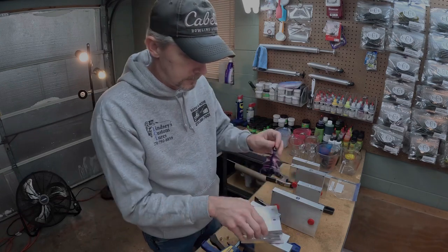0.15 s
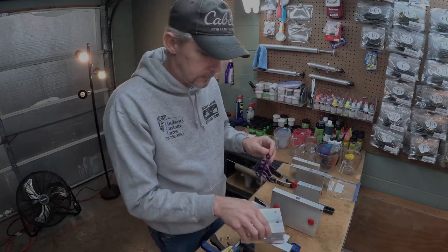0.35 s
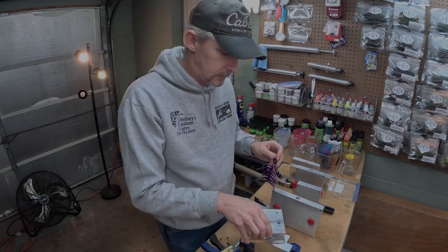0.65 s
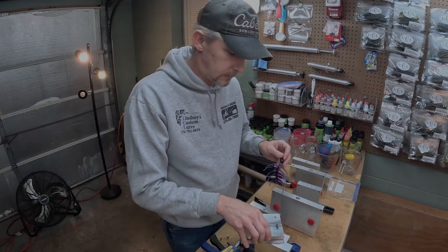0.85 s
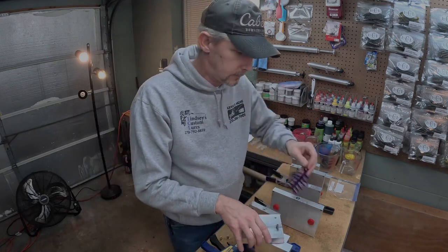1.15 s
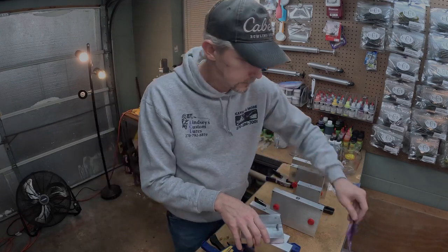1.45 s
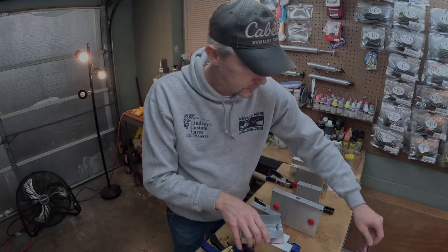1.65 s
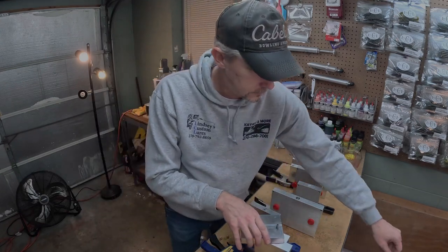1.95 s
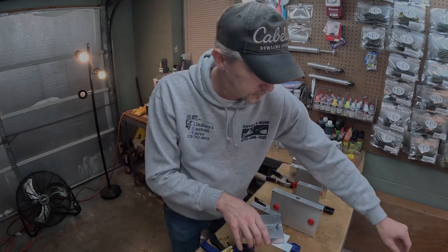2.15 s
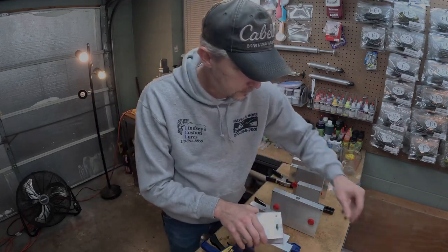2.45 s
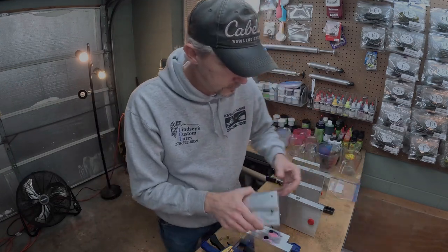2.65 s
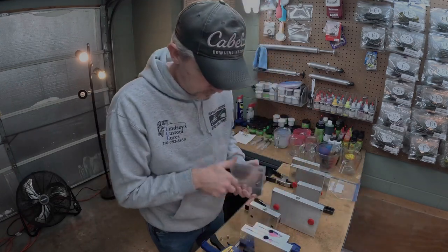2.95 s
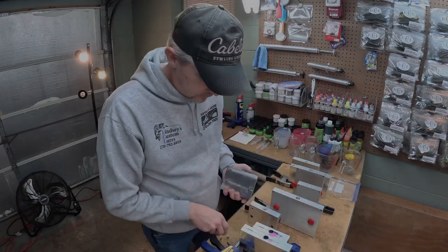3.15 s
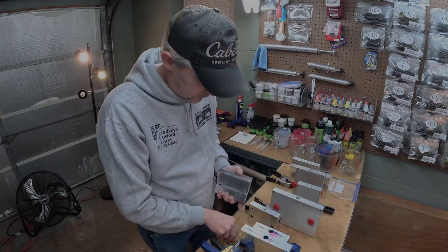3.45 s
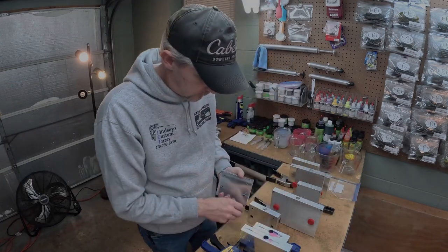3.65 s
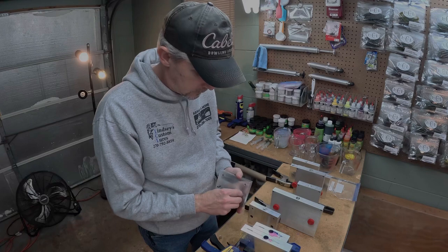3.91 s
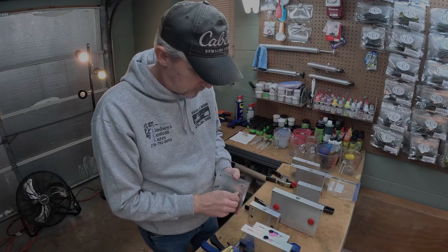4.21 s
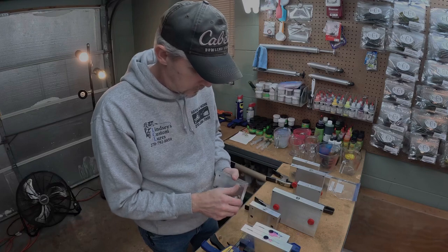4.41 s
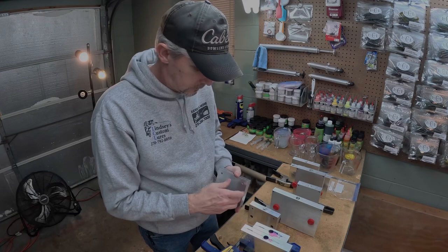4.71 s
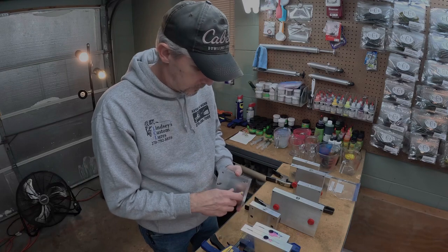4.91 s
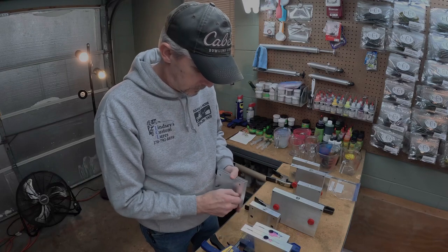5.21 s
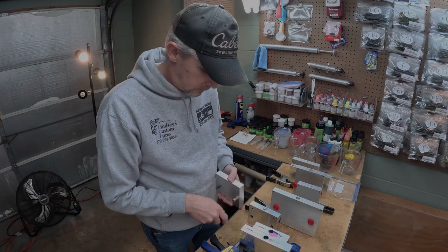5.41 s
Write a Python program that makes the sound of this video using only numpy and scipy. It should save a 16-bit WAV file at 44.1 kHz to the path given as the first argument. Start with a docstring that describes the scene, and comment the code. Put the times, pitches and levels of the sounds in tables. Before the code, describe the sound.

Heavy metal parts clink and clatter onto a wooden bench with a hard knock, then small pieces tick and scrape over a low hum.

```python
"""A heavy metal mold and its clamp clink together in a garage workshop and land on a wooden bench;
later a small mold is pried apart in the hands with ticks and a short scrape.
Each contact is a noise crack plus fading ring tones; the bench is resonances that boom and thud.
A motor hums in wavering tones, a fan hisses as filtered noise, and bare walls echo for about half a second."""
import sys
import numpy as np
from scipy import signal
from scipy.fft import rfft, irfft, next_fast_len
from scipy.io import wavfile
from scipy.ndimage import uniform_filter1d, map_coordinates

SR = 44100
rng = np.random.default_rng(int(sys.argv[2]) if len(sys.argv) > 2 else 0)


def generate_wav(signal):
    """Clip the signal to [-1, 1] and save it as 16-bit WAV at the path in sys.argv[1]."""
    frames = np.transpose(np.atleast_2d(signal))
    scaled = np.clip(frames, -1, 1) * 32767
    pcm = np.round(scaled).astype(np.int16)
    wavfile.write(sys.argv[1], SR, pcm)


N = 245637  # length in samples

# Ring pitches of each part of the big mold and its clamp. Each entry: pitch in Hz.
MOLD_HZ = [940, 2220, 2290, 2330, 2374, 2470, 2767, 3245, 3300, 3343]
BAR_HZ = [4745, 5975, 6345, 6455, 9835, 11590, 12500, 14160]
CLAMP_HZ = [3072, 3152, 3638, 3854, 4011, 4124]
SPRING_HZ = [5218, 6277, 6939, 12040]
LID_HZ = [1400, 1625, 1669, 1716, 1810, 1870]
JAW_HZ = [2536, 2595]
# How those pitches ring, in the same order. Each row: relative level in dB, time to fall by 60 dB in seconds.
MOLD_RING = [(-6.5, 0.1193), (-8.5, 0.12), (2.5, 0.12), (-12, 0.04), (-2.5, 0.14), (-10, 0.18), (-12.5, .1),
             (-6.5, 0.15), (-1.5, 0.064), (-7, 0.11)]
BAR_RING = [(3, 0.26), (-3.5, 0.17), (-14, .15), (-13, .15), (-23, .25), (-35, .15), (-35.5, .12),
            (-47, .2)]
CLAMP_RING = [(-12, .1), (4, 0.2), (-4.5, .12), (-19.5, .12), (-15, 0.077), (-14, .09)]
SPRING_RING = [(3.5, 0.081), (-20, .15), (-9.5, 0.083), (-39.5, .15)]
LID_RING = [(-3, 0.072), (-0.5, 0.1), (-0.5, 0.0878), (-11.5, 0.04), (-11.5, 0.1), (-24.5, 0.029)]
JAW_RING = [(0, 0.057), (6.5, 0.09)]
BIG_MOLD = {"mold": (MOLD_HZ, MOLD_RING), "bar": (BAR_HZ, BAR_RING), "clamp": (CLAMP_HZ, CLAMP_RING),
            "spring": (SPRING_HZ, SPRING_RING), "lid": (LID_HZ, LID_RING), "jaw": (JAW_HZ, JAW_RING)}

# Ring pitches of the small mold's edge. Each entry: pitch in Hz.
EDGE_HZ = [3190, 3275, 7100, 10000, 11600, 12600]
# How the edge rings. Each row: relative level in dB, time to fall by 60 dB in seconds.
EDGE_RING = [(-12, 0.021), (1, 0.051), (-26.5, 0.06), (-21.5, 0.018), (-31, 0.027), (-37, .02)]

# Colour of the big mold's cracks and sliding grit. Each row: frequency in Hz, relative level in dB.
DULL_COLOUR = [(290, -54), (500, -14.5), (1670, -3.5), (2920, -10), (3190, -5), (5340, -17), (7220, -24.5),
               (8580, -55), (11800, -47), (15400, -90.5)]


def amp(db):
    """Turn decibels into a plain multiplier."""
    return 10 ** (np.asarray(db) / 20)


def unit(x):
    """Scale a signal to an average (rms) level of 1."""
    return x / np.sqrt(np.mean(x ** 2) + 1e-20)


def along(points, hz):
    """Read a curve of (Hz, value) points, with pitch on a log axis."""
    f, v = np.transpose(points)
    return np.interp(np.log(hz + 1), np.log(f + 1), v)


def curves(rows):
    """One value per sample for each column after the time in seconds."""
    s, *cols = np.transpose(rows)
    return [np.interp(np.arange(N) / SR, s, c) for c in cols]


def within(rows, fade):
    """1 during the span of a curve, with soft ends of fade samples."""
    t = np.arange(N) / SR
    inside = 1. * (t > rows[0][0]) * (t < rows[-1][0])
    return uniform_filter1d(inside, fade)


def wobble(rate):
    """A smooth random curve with rate random points a second."""
    points = rng.standard_normal(int(N * rate / SR) + 4)
    return map_coordinates(points, [np.arange(N) * rate / SR])


def filtered(x, response):
    """Multiply the spectrum of x by a response of frequency."""
    m = next_fast_len(N + SR // 2)
    return irfft(rfft(x, m) * response(np.fft.rfftfreq(m, 1 / SR)), m)[..., :N]


def resonances(modes):
    """Response of a body that resonates at each (Hz, width in Hz, dB), with alternating signs."""
    def response(f):
        return sum((-1) ** k * amp(db) * 1j * f * width / (hz * hz - f * f + 1j * f * width)
                   for k, (hz, width, db) in enumerate(modes))
    return response


def struck(events, pieces, colour, crack_t60, rise_s):
    """Each contact cracks and rings the touched pieces, the others more softly; grips then change the ring.

    Returns three rows: left, right, and what goes to the walls."""
    # How strongly each piece rings, added to the contact's ring level.
    # Each entry: dB when touched, dB when only shaken by its neighbours.
    answer = {"mold": (-0.34, -12.5), "bar": (-7, -15), "clamp": (-2.2, -20), "spring": (-2.2, -25),
              "lid": (0.3, -15.5), "jaw": (-0.3, -12), "face": (-4, -12), "edge": (0.25, -14),
              "pin": (0.31, -60), "plate": (-0.27, -29), "block": (0.3, -8.5)}
    # A hand or the bench takes hold of whatever is ringing.
    # Each row: time in seconds, level change in dB (negative damps).
    grips = [(.098, 3), (.205, -15), (.355, -1), (0.404, -40), (.80, -6), (.762, -8), (.866, -6),
             (.885, -8), (0.939, -45), (1.02, -39), (2.935, -11), (2.99, -6), (4.0, -19.5), (4.13, -2),
             (4.422, -1), (4.606, -8), (4.693, -26), (4.866, -14.5)]
    grip_s = 0.011  # time a grip takes
    aim_db, scatter_db = 2.2, 1.5  # random spread of a mode: between left and right, and in strength
    flutter, flutter_per_s = 0.54, 100  # loose pieces rattle: depth and rate of the changes
    ring_echo_db = -9  # rings reach the walls more weakly than cracks
    lead = 400  # samples of room for the crack's filter ahead of the contact

    out, t = np.zeros((3, N + SR)), np.arange(SR // 3) / SR
    hz = np.concatenate([pitches for pitches, modes in pieces.values()])
    level, t60 = np.concatenate([modes for pitches, modes in pieces.values()]).T
    owner = [name for name, (pitches, modes) in pieces.items() for _ in pitches]
    rings = amp(-60 * t / t60[:, None]) * np.exp(2j * np.pi * hz[:, None] * t)
    # overlapping triangles join the random flutter values; flutter starts from nothing
    knots = np.maximum(1 - abs(t * flutter_per_s - np.arange(40)[:, None]), 0)
    knots = knots * np.minimum(t * flutter_per_s, 1)
    grid = np.fft.rfftfreq(len(t), 1 / SR)
    rise = np.sin(np.pi / 2 * np.minimum(t / rise_s, 1)) ** 2

    for s, crack_db, bright_db, ring_db, touched in events:
        strength = [answer[name][name not in touched] for name in owner]
        scatter = scatter_db * rng.standard_normal(len(hz))
        aim = aim_db * rng.standard_normal(len(hz)) * [[1], [-1]]  # each mode radiates more to one side
        size, phase = flutter * rng.standard_normal((2, len(hz), len(knots))) @ knots
        fluttering = (1 + size) * rings.imag + phase * rings.real
        ring = amp(level + strength + scatter + aim + ring_db) @ fluttering
        ring = np.vstack([ring, amp(ring_echo_db) * ring[0]])
        held_db = sum(change * np.clip((s + t - at) / grip_s, 0, 1) for at, change in grips if at > s)

        tilt_db = bright_db * np.log2(np.maximum(grid, 500) / 3000)
        shape = amp(along(colour, grid) + tilt_db)
        burst = np.roll(rng.standard_normal(len(t)) * rise * amp(-60 * t / crack_t60), lead)
        crack = irfft(rfft(burst) * unit(shape), len(t))

        start = round(s * SR)
        out[:, lead + start:][:, :len(t)] += ring * rise * amp(held_db)
        out[:, start:][:, :len(t)] += amp(crack_db) * crack
    return out[:, lead:N + lead]


def big_mold_clinks():
    """The parts of the big mold and clamp hit each other: dull cracks and long metal rings."""
    # Contacts of the big mold. Each row: time in seconds, relative crack level in dB,
    # brightness in dB per octave, relative ring level in dB, pieces touched.
    contacts = [(0.0034, -29, -5.5, -38, "mold bar clamp jaw"), (0.0114, -34, -9, -57, "mold lid jaw"),
                (0.1, -30.5, -4, -40.5, "bar clamp"), (0.1037, -25.5, -2.5, -40, "mold bar clamp lid"),
                (0.1214, -60, 7, -32.5, "mold"), (0.1277, -34, -19.5, -45, "mold lid jaw"),
                (0.2104, -30, -1.5, -43, "mold bar lid jaw"), (0.2257, -41.5, -10, -37, "mold lid"),
                (0.297, -36, -5.5, -40, "mold"), (0.3164, -55, 0.5, -48.5, "mold lid jaw"),
                (0.3579, -21.5, 2, -26, "mold lid"), (0.3616, -20.5, -2.5, -28.5, "mold lid jaw"),
                (0.3661, -16.5, -0.5, -31.5, "spring lid jaw"), (0.3824, -40.5, -17.5, -31.5, "bar"),
                (0.3994, -39, -5, -38, "bar lid jaw"), (0.4318, -45.5, -3, -48, "bar clamp lid"),
                (0.5056, -47, 8, -53, "mold bar spring jaw"),
                (0.5498, -28, -1, -46.5, "mold spring lid jaw"), (0.5808, -55, 0.5, -58, "mold clamp jaw"),
                (0.6533, -47, -3, -62, "mold clamp lid jaw"), (0.6714, -48, -0.5, -61, "clamp spring"),
                (0.6925, -51.5, -3, -59, "bar spring lid jaw"), (0.7054, -41.5, -1.5, -56, "bar clamp lid"),
                (0.724, -29, -5.5, -42.5, "mold bar"), (0.7312, -34.5, 3.5, -35, "mold bar jaw"),
                (0.7431, -35, 5.5, -33, "spring jaw"), (0.7508, -38.5, -14, -46, "mold clamp"),
                (0.7678, -34.5, 1, -38.5, "jaw"), (0.7832, -32.5, -8, -35.5, "jaw"),
                (0.7902, -38.5, 0.5, -43.5, "mold clamp jaw"), (0.8222, -38.5, 9, -50, "clamp spring"),
                (0.8692, -21.5, 2, -26.5, "mold clamp lid"),
                (0.8925, -15.5, -3, -25.5, "mold spring lid jaw"), (0.9034, -15, 3, -16, "clamp"),
                (0.9154, -30.5, -0.5, -25.5, "clamp spring lid"), (0.9243, -24.5, 2, -32, "mold clamp"),
                (0.983, -36, -3.5, -37.5, "clamp"), (0.9966, -18, -1, -28, "clamp spring jaw"),
                (1.0048, -27.5, 5.5, -24.5, "mold spring")]
    return struck(contacts, BIG_MOLD, DULL_COLOUR, crack_t60=0.024, rise_s=0.0015)


def knocks():
    """Pieces are set down or knocked: sharp cracks with short-lived plate and block rings."""
    # Contacts of the plate and block. Each row: time in seconds, relative crack level in dB,
    # brightness in dB per octave, relative ring level in dB, pieces touched.
    contacts = [(1.0191, -7.5, -1.5, -13.5, "plate block"), (1.0277, -24, -1, -28, "plate block"),
                (1.0379, -25, -1.5, -35, "plate"), (1.2132, -33.5, -5.5, -36.5, "block"),
                (1.2396, -30, -6, -52, "block"), (2.3616, -46.5, -6, -49.5, "block"),
                (3.1837, -47, -0.5, -39, "block"), (3.4395, -56, -10, -49, "block"),
                (3.4687, -37, -11.5, -50, "block")]
    # Ring pitches of the plate and the block. Each entry: pitch in Hz.
    plate_hz = [2374, 3177, 4977, 7500, 12040]
    block_hz = [1150, 1230, 1430]
    # How they ring. Each row: relative level in dB, time to fall by 60 dB in seconds.
    plate_ring = [(-1, 0.19), (-10, .04), (0, 0.18), (-8.5, 0.023), (-29.5, .05)]
    block_ring = [(-7, 0.046), (-1.5, 0.026), (-6.5, 0.039)]
    # Colour of a sharp crack. Each row: frequency in Hz, relative level in dB.
    sharp_colour = [(180, -30), (300, -8.5), (1440, -3), (1970, -17.5), (2400, -2.5), (2780, -6),
                    (4950, -8), (5560, -12), (12300, -27), (15400, -63)]
    pieces = {"plate": (plate_hz, plate_ring), "block": (block_hz, block_ring)}
    return struck(contacts, pieces, sharp_colour, crack_t60=0.021, rise_s=0.0014)


def small_mold_ticks():
    """The small mold is pried apart: brittle cracks and brief rings of its light parts."""
    # Contacts of the small mold. Each row: time in seconds, relative crack level in dB,
    # brightness in dB per octave, relative ring level in dB, pieces touched.
    contacts = [(2.8726, -58, -8, -49, "face edge"), (2.9168, -43, -5, -38.5, "face edge"),
                (2.9427, -49, -5.2, -45, "edge"), (2.9549, -52, -5, -59, "edge"),
                (2.9836, -43, 2.5, -62, "edge"), (3.0014, -59.5, -5, -56.5, "edge"),
                (3.9255, -25.5, 2.5, -35, "pin"), (3.9574, -48, -5, -45, "pin"),
                (4.0027, -56, -7.5, -55, "edge"), (4.0357, -48, 2, -46.5, "face"),
                (4.0691, -44, 3, -45, "face edge"), (4.0778, -32, 2, -40, "edge"),
                (4.0986, -49, -8, -48.5, "face edge"), (4.3189, -45, 7, -45, "edge"),
                (4.4127, -52, -10.5, -44, "edge"), (4.5753, -30, 4.5, -36, "edge"),
                (4.6165, -38.5, 3, -36.5, "edge"), (4.6306, -49, -2, -43.5, "edge"),
                (4.641, -44, -3, -49, "face"), (4.6525, -38, 0.5, -32.5, "edge"),
                (4.6646, -44, 1, -35, "edge"), (4.6749, -47, -7, -58, "face edge"),
                (4.6868, -50, 4, -47, "face edge"), (4.8236, -46.5, -2, -50, "edge"),
                (4.8474, -43, -3, -43, "edge"), (4.8604, -23.5, 2.5, -42, "face edge")]
    # Ring pitches of the face and the pin. Each entry: pitch in Hz.
    face_hz = [2350, 2520]
    pin_hz = [5082, 5210, 6810, 9685]
    # How they ring. Each row: relative level in dB, time to fall by 60 dB in seconds.
    face_ring = [(-1, 0.078), (3, 0.039)]
    pin_ring = [(5.5, 0.038), (-8.5, 0.15), (-8, .07), (-20, .06)]
    # Colour of a brittle crack. Each row: frequency in Hz, relative level in dB.
    brittle_colour = [(590, -40), (1000, -3.5), (3110, 2), (4540, -7), (7860, -6.5), (9120, -13.5),
                      (12300, -17), (14600, -47), (15400, -60)]
    pieces = {"face": (face_hz, face_ring), "edge": (EDGE_HZ, EDGE_RING), "pin": (pin_hz, pin_ring)}
    return struck(contacts, pieces, brittle_colour, crack_t60=0.016, rise_s=0.0012)


def scrape(strokes, parts, grit, blur, grit_db):
    """Rough faces slide: uneven grains of force excite the damped modes of the pieces and add grit."""
    grains = rng.standard_normal(N) * amp(3 * wobble(250))
    # a larger blur widens each resonance, so the pieces ring less
    modes = sorted((hz, blur / t60, db) for pitches, rings in parts for hz, (db, t60) in zip(pitches, rings))
    body = unit(filtered(grains, resonances(modes)))
    rasp = unit(filtered(grains, lambda hz: amp(along(grit, hz))))
    loudness = sum(amp(curves(rows)[0]) * within(rows, 600) for rows in strokes)
    return (body + amp(grit_db) * rasp) * loudness


def big_mold_slide():
    """The big mold slides: grains of force shake all its parts."""
    # Strength of the sliding. Each row: time in seconds, relative level in dB.
    slide = [(0.0, -43), (0.152, -78), (0.358, -76), (0.56, -69), (0.78, -65.5), (0.824, -63.5),
             (0.908, -44), (0.956, -54.5), (1.05, -61.5)]
    return scrape([slide], BIG_MOLD.values(), DULL_COLOUR, blur=4, grit_db=-7)


def small_mold_rub():
    """The halves of the small mold rub: grains of force shake its edge."""
    # One list per stroke of rubbing. Each row: time in seconds, relative level in dB.
    strokes = [
        [(3.99, -61), (4.064, -61), (4.08, -47), (4.104, -54.5), (4.14, -74)],
        [(4.26, -67), (4.322, -56.5), (4.336, -71), (4.36, -61)],
        [(4.58, -49), (4.594, -54.5), (4.664, -43.5), (4.7, -67)],
        [(4.815, -71), (4.853, -61), (4.863, -42), (4.87, -45)],
    ]
    # Colour of the rubbing. Each row: frequency in Hz, relative level in dB.
    grit_colour = [(880, -54), (1500, -22), (2670, -7.5), (3370, -5.5), (3720, -13.5), (7150, -14),
                   (12000, -55), (15400, -91)]
    return scrape(strokes, [(EDGE_HZ, EDGE_RING)], grit_colour, blur=6.3, grit_db=0.0)


def thud(modes, push_s):
    """The answer of a body to one smooth push, peak 1; a larger push_s is a softer landing."""
    u = np.arange(N) / SR / push_s
    sound = filtered(u * np.exp(-u), resonances(modes))[:SR // 2]
    return sound / np.abs(sound).max()


def bench():
    """Landings ring the wooden top and the floor; shifting weight makes the top boom."""
    # Weight landing on the bench. Each row: time in seconds, peak of the top in dB, peak of the floor in dB.
    landings = [(0.106, -35, -55), (0.362, -24.5, -52), (0.429, -29.5, -45.5), (0.731, -37, -53),
                (0.886, -28.5, -46), (0.93, -36, -43), (1.026, -24, -41), (1.039, -18.5, -42),
                (1.126, -28, -59), (1.244, -42, -62), (2.13, -51, -48.5), (2.423, -37.5, -59),
                (3.199, -42.5, -50.5), (3.237, -58, -49), (3.445, -40, -50), (3.479, -36, -52)]
    # The bench top boomed by shifting weight. Each row: time of the peak in seconds, pitch in Hz, tone peak in dB.
    booms = [(0.012, 325, -43), (0.125, 305, -41), (0.228, 330, -46), (0.32, 310, -45.5), (0.369, 295, -30),
             (0.446, 336, -39.5), (0.52, 295, -47), (0.608, 320, -32.5), (0.67, 300, -41),
             (0.746, 317, -27), (0.791, 330, -34.5), (0.845, 325, -39), (0.915, 295, -36.5),
             (0.98, 320, -44.5), (1.038, 308, -21.5), (1.09, 300, -34.5), (1.14, 305, -34.5),
             (1.25, 310, -46.5), (2.465, 317, -35.5), (3.452, 306, -49), (3.491, 350, -42.5)]
    # Resonances of the wooden top. Each row: frequency in Hz, width in Hz, relative level in dB.
    top_modes = [(130, 42, -15), (191, 74, -12.5), (275, 24, 5.5), (360, 40, 6.5), (434, 31, 3),
                 (665, 92, -16.5), (1000, 250, -18.5)]
    # The floor under the bench. Each row: frequency in Hz, width in Hz, relative level in dB.
    floor_modes = [(60, 18, 2.5)]
    swell_db_per_s, fade_db_per_s = 603, 450  # how fast a boom grows and dies

    out, t = np.zeros(N + SR), np.arange(N) / SR
    top, floor = thud(top_modes, push_s=0.0015), thud(floor_modes, push_s=0.003)
    for s, top_db, floor_db in landings:
        out[round(s * SR):][:len(top)] += amp(top_db) * top + amp(floor_db) * floor

    # noise in the bench modes, under each boom
    grumble = amp(-8.5) * unit(filtered(rng.standard_normal(N), resonances(top_modes)))
    for s, hz, db in booms:
        near = t[max(round((s - .1) * SR), 0):round((s + .15) * SR)]
        swell = np.minimum(swell_db_per_s * (near - s), fade_db_per_s * (s - near))
        first = round(near[0] * SR)
        span = slice(first, first + len(near))
        tone = np.sin(2 * np.pi * (hz * near + rng.random()))
        out[span] += amp(db + swell) * (tone + grumble[span])
    return out[:N]


def walls(x, apart, hop=SR // 8):
    """Each frequency of the echo dies at its own speed; moving pieces meet a new echo pattern every moment."""
    # How long the echo lasts. Each row: frequency in Hz, time to fall by 60 dB in seconds.
    echo_times = [(200, 0.98), (1000, 0.69), (3000, 0.56), (7000, .42), (13000, 0.17)]
    delay = 200  # samples before the echo starts
    out, x = np.zeros((2, N + 3 * SR)), np.pad(x, (hop, 2 * hop))
    for start in range(0, N + hop, hop):
        # more of the separate noises makes the two sides less alike
        shared, left, right = rng.standard_normal((3, SR * 3 // 4))
        hz, t, z = signal.stft([shared + apart * left, shared + apart * right], SR, nperseg=256)
        fade = amp(-60 * t / along(echo_times, hz)[:, None])
        tail = signal.istft(z * fade, SR, nperseg=256)[1]
        moment = x[None, start:start + 2 * hop] * np.hanning(2 * hop)
        wet = signal.fftconvolve(moment, tail / np.linalg.norm(tail[0]), axes=1)
        out[:, start + delay:start + delay + wet.shape[1]] += wet
    return out[:, hop:N + hop]


def motor():
    """A main tone that wavers in level and phase, with a few thin tones of fixed pitch."""
    # Drift of the main tone. Each row: time in seconds, rms level in dB before the waver.
    hum_level = [(0.0, -44.5), (0.12, -43), (0.37, -46.5), (0.4, -51.5), (0.49, -43.5), (1.33, -45.5),
                 (2.09, -43), (2.2, -47.5), (2.5, -41), (2.9, -43.5), (2.99, -51), (3.05, -44),
                 (3.72, -40.5), (3.77, -45.5), (3.97, -41), (4.98, -47.5), (5.49, -42), (5.57, -43)]
    # Thin motor tones. Each row: pitch in Hz, rms level in dB before the waver.
    whines = [(646.0, -61.5), (764.4, -67.5)]
    hum_hz, waver_db, waver_rad = 232.7, 1.6, 0.6
    db, = curves(hum_level)
    t = np.arange(N) / SR
    tone = amp(db + waver_db * wobble(14)) * np.sin(2 * np.pi * hum_hz * t + waver_rad * wobble(11))
    whine = sum(amp(level + 2 * wobble(8)) * np.sin(2 * np.pi * hz * t + wobble(4)) for hz, level in whines)
    return np.sqrt(2) * (tone + whine)  # a sine of rms 1 has a peak of root 2


def rush(spectrum):
    """Stereo noise of rms 1, partly alike in both channels."""
    # How alike the channels are. Each row: frequency in Hz, left-right likeness (1 is identical).
    likeness = [(60, 0.94), (180, 0.91), (550, 0.8), (1650, 0.28), (4970, 0.25), (15000, 0.4)]

    def split(hz):
        turn = np.arccos(np.clip(along(likeness, hz), -1, 1)) / 2
        return amp(along(spectrum, hz)) * [np.cos(turn), np.sin(turn)]
    mid, side = filtered(rng.standard_normal((2, N)), split)
    return unit(np.array([mid + side, mid - side]))


def fan():
    """Moving air as coloured noise, with a lumpy rumble under it."""
    # Loudness of the air. Each row: time in seconds, rms level in dB before a slight waver.
    air_level = [(1.5, -58), (3.1, -55), (5.57, -55.5)]
    # Colour of the air. Each row: frequency in Hz, relative level in dB.
    air_colour = [(160, -29), (270, -2), (354, 0), (372, -12), (472, -5), (609, -11.5), (662, -8.5),
                  (721, -6.5), (785, -11), (1260, -13.5), (1570, -13.5), (3200, -25.5), (4800, -22),
                  (10300, -39), (15400, -59)]
    # Colour of the rumble. Each row: frequency in Hz, relative level in dB.
    rumble_colour = [(12, -48), (20, -20.5), (38, -23.5), (64, -15.5), (86, -31.5), (119, -17),
                     (171, -18.5), (198, -19), (210, -10.5), (270, -28), (460, -120)]
    db, = curves(air_level)
    air = amp(db + .6 * wobble(7.7)) * rush(air_colour)
    rumble = amp(-59 + 2 * wobble(5.4)) * rush(rumble_colour)
    return air + rumble


def scene():
    """Mix the metal, the bench, their echo, the motor and the fan."""
    clinks, knocking, ticks = big_mold_clinks(), knocks(), small_mold_ticks()
    sliding = big_mold_slide() + small_mold_rub()
    wood = bench()
    to_walls = amp(-4.0) * (clinks + knocking)[2] + amp(-7) * (ticks[2] + sliding) + amp(-13) * wood
    echo = walls(to_walls, apart=0.53)
    metal = (clinks + knocking + ticks)[:2] + sliding
    placed = metal * amp([[-.4], [.4]])  # slightly to the right
    return placed + wood + echo + motor() + fan()


def record(dry):
    """Cut everything from 15600 Hz up."""
    return filtered(dry, lambda hz: hz < 15600)


dry = scene()
out = record(dry)
generate_wav(out)
```